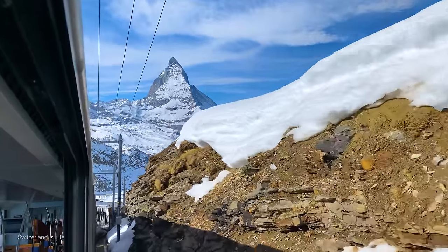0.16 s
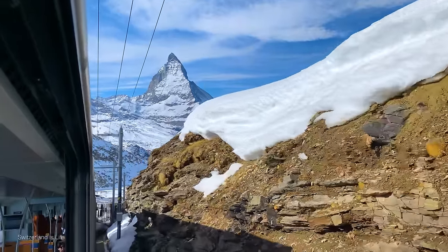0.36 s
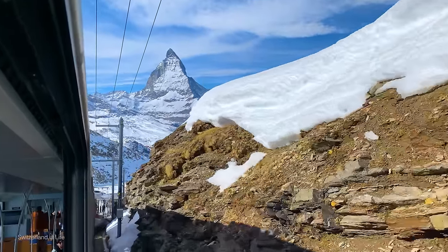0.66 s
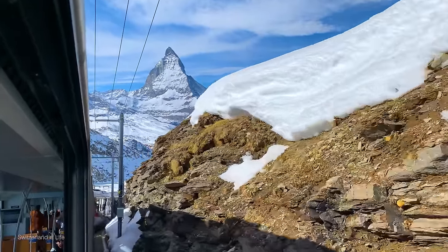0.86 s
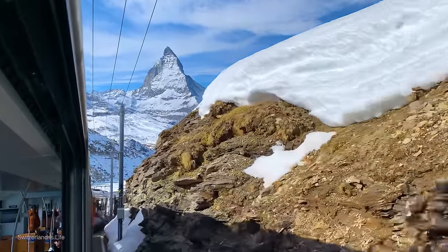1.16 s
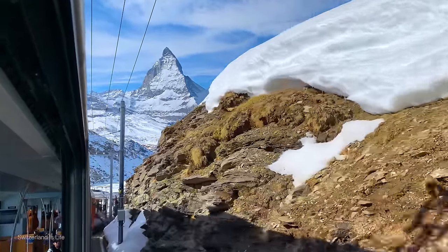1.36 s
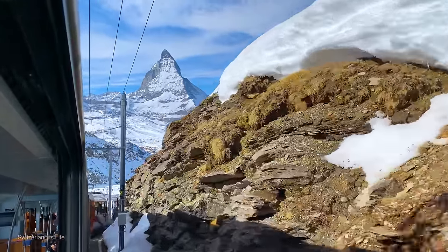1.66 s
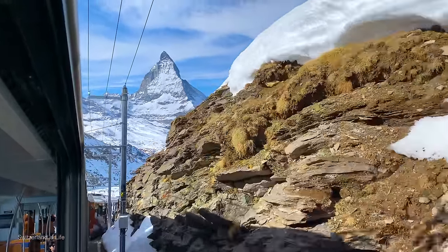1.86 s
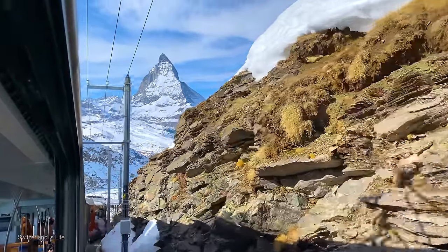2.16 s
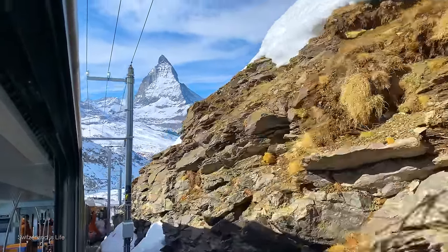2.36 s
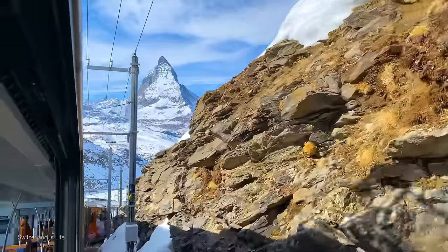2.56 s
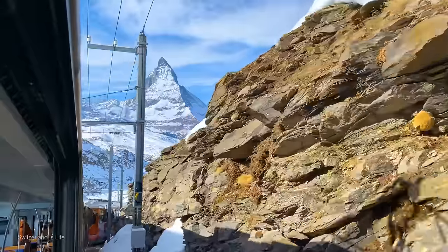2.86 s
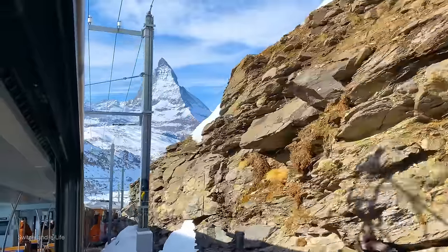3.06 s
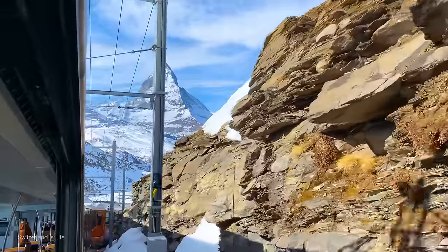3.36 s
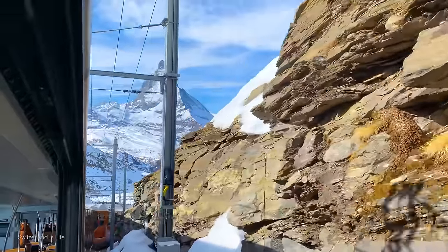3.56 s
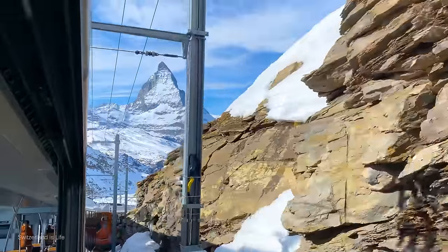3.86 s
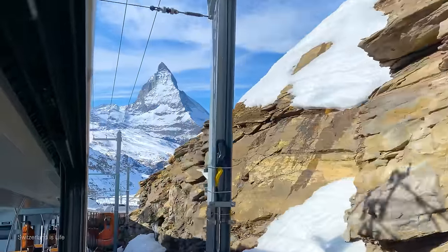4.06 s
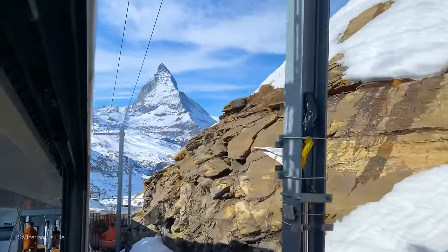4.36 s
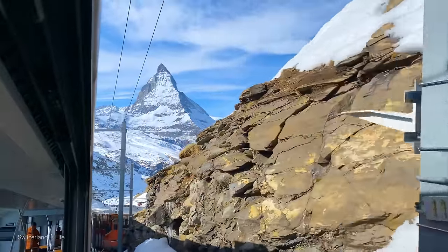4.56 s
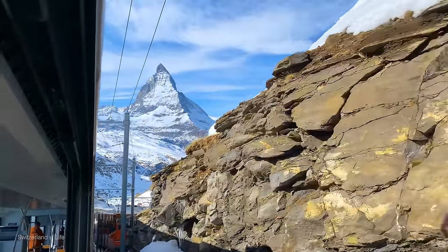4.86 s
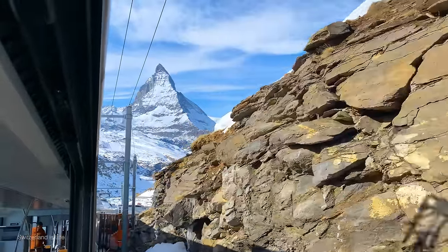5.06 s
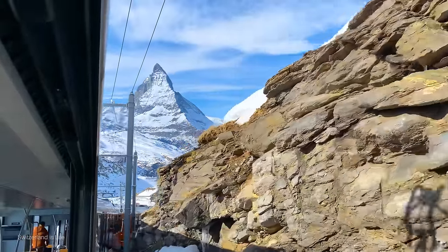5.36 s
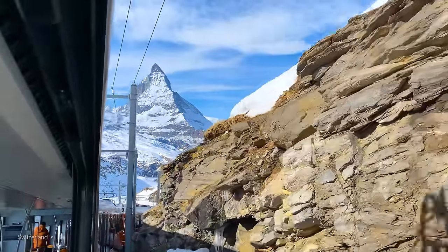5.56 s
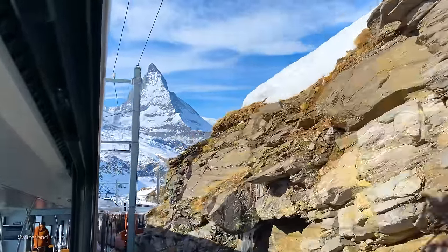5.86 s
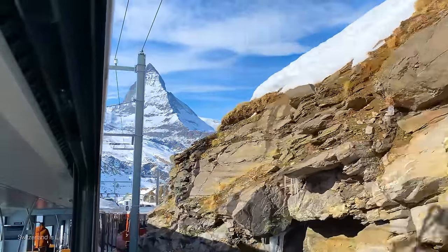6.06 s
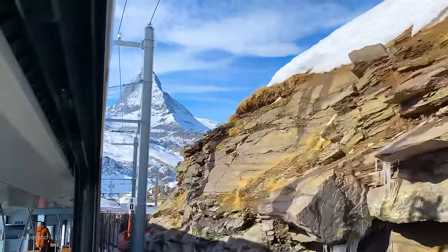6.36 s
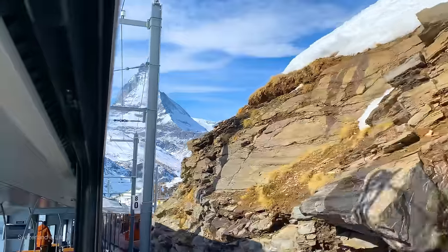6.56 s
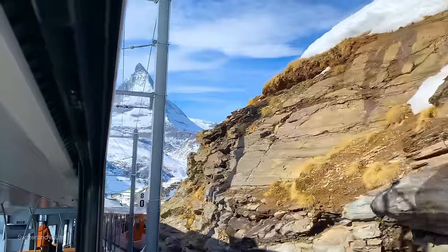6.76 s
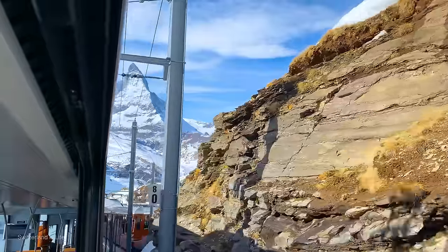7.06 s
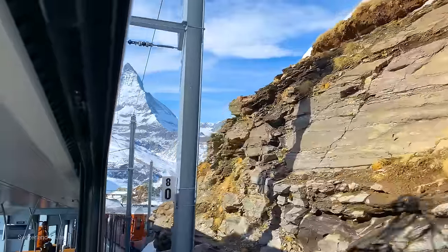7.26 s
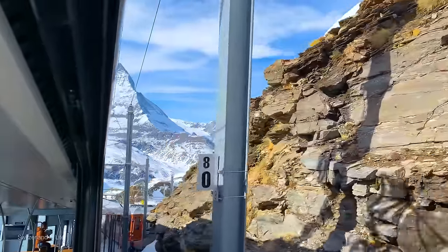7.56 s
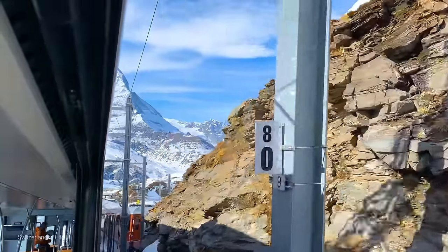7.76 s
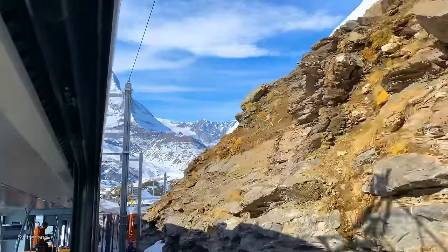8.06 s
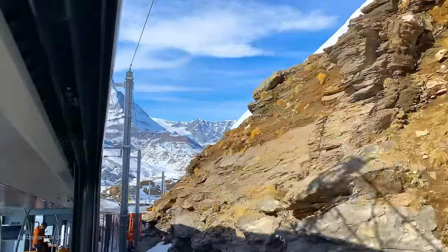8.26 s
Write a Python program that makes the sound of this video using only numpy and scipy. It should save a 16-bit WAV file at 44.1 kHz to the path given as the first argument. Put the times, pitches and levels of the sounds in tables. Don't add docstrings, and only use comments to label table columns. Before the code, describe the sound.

From 0 to 8.4 s an electric rack train rumbles steadily, heard inside the carriage at an open window beside a rock cutting. Most energy is low: cog teeth throb unevenly around 84 Hz, the frame rings near 170 Hz, and floor, walls and windows boom up to about 600 Hz. A faint wall hum fades around 2 s. Soft thuds, hollow panel rings and trim buzzes recur, notably near 2, 2.9, 5.2, 6 and 6.4 s. Rolling, grinding and gear whine sit quieter above, with whine rising near 1.1 and 4.5 s, plus a small clack at 4.76 s. At 2.44 s a valve gives a short airy puff with a weak trailing leak. Light flange scraping begins about 6.5 s; from 7.3 s thin, flickering high squeals continue to the end, still beneath the rumble. Close, lightly decorrelated stereo.

```python
import sys
import numpy as np
from scipy import signal
from scipy.fft import rfft, irfft, next_fast_len
from scipy.io import wavfile
from scipy.ndimage import uniform_filter1d

SR = 44100
rng = np.random.default_rng(int(sys.argv[2]) if len(sys.argv) > 2 else 0)


def log_audio(samples):
    frames = np.atleast_2d(samples).T
    limited = np.clip(frames, -1, 1)
    pcm = np.round(limited * 32767).astype(np.int16)
    wavfile.write(sys.argv[1], SR, pcm)


def to_linear_factor(level_db):
    exponent = np.asarray(level_db, float) / 20
    return 10 ** exponent


N = 370440
HZ, T = np.fft.rfftfreq(next_fast_len(N), 1 / SR), np.arange(N) / SR
LOG_HZ = np.log(HZ + 1)

# (frequency [Hz], level per Hz [dB])
FLOOR_COLOUR = [(18, -47), (28, -16), (40, -8.5), (60, 0.5), (100, -2.5), (140, 1.5), (180, -7.5),
                (220, -12.5), (300, -24)]
WALL_COLOUR = [(140, -48), (190, -0.5), (290, -3.5), (330, -27), (400, -50)]
WINDOW_COLOUR = [(250, -37), (310, -1), (440, -6), (490, -8.5), (600, -44)]
TRIM_COLOUR = [(380, -18.5), (460, -8.5), (560, -8), (720, -14), (820, -21), (1100, -43)]
# (frequency [Hz], width [Hz], level [dB])
PANEL_MODES = [(138, 14, -2), (204, 11, -10), (254.4, 7.4, 2), (355, 31, 0), (401, 7.8, 2.5),
               (440, 13, -1.5), (581, 30, -13.5), (650, 19, -8)]
# (time [s], rise [dB], half length [s])
THUDS = [(0.02, -1.5, 0.045), (.18, 4, 0.027), (1.08, 2.5, 0.047), (1.71, -0.5, 0.025), (1.99, 6.5, .04),
         (2.9, 1.5, .25), (4.5, 2.5, .15), (5.36, 2, 0.099), (6.22, -2, 0.05), (6.43, 8, 0.022),
         (7.0, 5, .12), (7.55, 2, .08), (8.21, 4, .06)]
# (time [s], rise [dB], half length [s])
BUZZES = [
    (1.94, -2, 0.046),
    (3.63, 3.5, 0.099),
    (4.54, 1, .08),
    (5.78, 0, .05),
    (6.1, 3, 0.088),
    (6.38, 4, 0.063),
    (6.74, 2, 0.11),
    (8.1, 1.5, 0.17),
]
# (time [s], echo [dB])
ROCK_ECHO = [(0, 1.5), (.5, -1.5), (.9, -3), (1.3, -3), (1.8, -1), (2.2, 1.5), (2.8, 1.5), (3.5, 2),
             (4.1, 2.5), (4.65, 4.5), (5.2, 1), (5.8, 2), (6.4, 0.5), (6.9, -1.5), (7.3, -1.5), (7.8, 2.5),
             (8.15, 3), (8.4, 5)]
# (time [s], load [dB])
BODY_LOAD = [(0, -2), (.6, 1), (1.3, 0), (2.1, -0.5), (2.5, -0.5), (3.0, 1.5), (3.4, 3), (3.8, 3),
             (4.2, 0.5), (4.5, -4), (5.0, -3), (5.55, -6), (5.85, -3), (6.3, -2), (6.9, -6), (7.3, -4),
             (7.8, -2.5), (8.4, -5)]
# (level [dB], share of the rock echo, share of the load)
FLOOR_MIX, WALL_MIX = (-25.5, -0.064, 0.05), (-24.5, 0.13, 0.44)
WINDOW_MIX, TRIM_MIX = (-24.3, 0.092, 0.79), (-30, 0.59, 0.16)
ROLL_MIX, GRIND_MIX, WHINE_MIX = (-38, 0.2, 0.16), (-48.5, 0.66, 0.055), (-39.5, -.2, .6)
RING_MIX, RATTLE_MIX, HISS_MIX = (-47.5, 0.54, .4), (-51.5, 1.34, 0.05), (-67.5, 0.54, .1)

TOOTH_HZ, TOOTH_SAG_HZ_PER_S, TOOTH_DB, DOUBLE_DB = 84.4, .45, -29, -28
# (time [s], rise [dB], half length [s])
BITES = [(.15, 9.5, 0.057), (.7, 8, 0.14), (1.1, 4, 0.075), (1.45, 6, 0.05), (1.8, 9.5, 0.1),
         (2.2, 3, 0.25), (2.85, 3.5, 0.18), (3.3, 2, 0.22), (4.45, 9, 0.079), (4.95, 10, 0.073),
         (5.7, 9.5, 0.21), (6.25, 9.5, 0.26), (7.05, 9.5, 0.19), (7.5, 5.5, 0.29), (7.85, 8, 0.17)]
# (time [s], rise [dB], half length [s])
FRAME_RINGING = [(.05, 7, .06), (.75, 6.5, 0.24), (1.1, 4, 0.13), (1.8, 2, 0.35), (2.6, 8.5, .1),
                 (3.0, 7, 0.052), (3.4, 6, 0.21), (3.65, 5.5, 0.082), (4.0, 10.5, 0.14), (4.35, 6.5, 0.056),
                 (4.8, 8, 0.32), (5.4, 9, 0.2), (6.6, 7, 0.092), (7.05, 8.5, 0.28), (7.7, 2.5, 0.18)]

# (frequency [Hz], level per Hz [dB])
ROLL_COLOUR = [(550, -44), (750, -1), (900, -4), (1200, -6), (1450, -7.5), (2200, -16), (2500, -25),
               (3200, -33)]
GRIND_COLOUR = [(2400, -19), (3200, -4.5), (4400, -8), (5200, -11), (7600, -18.5), (9000, -17)]
RATTLE_COLOUR = [(1800, -9), (2250, 0), (2700, -1.5), (3150, -4), (3700, -39)]
# (frequency [Hz], width [Hz], level [dB])
RAIL_MODES = [(866, 55, 0), (1600, 75, -0.5), (1682, 41, 0), (1772, 87, -5.5), (1950, 340, -12)]
WHEEL_MODES = [(3520, 100, -2.5), (3797, 63, 1), (3980, 290, -1), (4205, 90, -3)]
# (time [s], rise [dB], half length [s])
PULLS = [
    (0.02, 8.5, 0.17),
    (.75, 3, 0.12),
    (1.12, 6.5, 0.084),
    (3.75, 0.5, 0.12),
    (4.55, 9, .12),
    (7.38, 4, .2),
    (8.38, 7, .08),
]

# (frequency [Hz], level per Hz [dB])
HISS_COLOUR = [(4000, -24), (6000, -3.5), (7800, -7.5), (8250, -7), (9000, -5), (10000, 0), (11500, -5),
               (13000, -11), (15600, -14), (16000, -14)]
JET_COLOUR = [(1500, -10), (3000, -8), (7800, -4.5), (8300, -7), (9300, -4.5), (10800, -1.5), (12500, -3.5),
              (14000, -9), (16000, -7)]
# (time [s], rise [dB], half length [s])
HISS_LULL = [
    (6.92, -2, .15),
]
VALVE_S, VALVE_DB, OPEN_S, HOLD_S, BLOW_DB_PER_S = 2.437, -42, 0.008, 0.052, 62
SURGE_DB, SURGE_S = 1.5, .03
LEAK_DB, LEAK_DB_PER_S = -57, 8.5

# (time [s], level [dB], pitch [Hz], length [s])
RING_NOTES = [(.2, -27, 138, .06), (0.966, -25, 355, 0.035), (1.1, -27, 138, 0.047), (1.7, -22, 145, 0.075),
              (2.141, -22, 356, 0.049), (2.5, -22.5, 136, .07), (2.87, -19.5, 134, 0.073),
              (3.485, -23, 347, 0.063), (3.96, -26, 361, 0.054), (3.3, -27, 445, 0.12),
              (4.19, -25, 415, 0.05), (4.299, -23, 262, 0.045), (4.5, -34.5, 1650, .05),
              (4.765, -44, 2570, .025), (4.81, -42, 2610, 0.015), (4.755, -36, 1740, .02),
              (5.15, -20.5, 247.7, 0.085), (5.75, -24, 385, 0.03), (5.965, -17, 251.8, 0.042),
              (6.021, -24, 355, 0.097), (6.448, -27.5, 369, 0.085), (5.84, -22, 390, .035),
              (6.83, -24, 206, 0.054), (.68, -37, 796, .05), (1.18, -37, 872, .05), (2.62, -38, 785, .04),
              (3.16, -23, 362, .07), (3.24, -27, 441, .05), (3.53, -24, 344, .04), (3.78, -31, 516, .04),
              (3.9, -24, 352, .06), (4.16, -23, 345, .04), (4.28, -32, 559, .04), (4.69, -37, 742, .04),
              (6.79, -40, 1281, .03), (7.35, -29, 430, .05), (7.56, -35, 650, .05), (7.74, -29, 465, .05),
              (7.86, -28, 400, .05), (8.19, -38, 1141, .03), (8.23, -37, 1216, .03), (8.1, -45, 5720, .03),
              (8.19, -46, 2690, .025), (5.49, -20, 161, .05), (3.6, -21, 190, .04), (8.27, -29, 450, .05),
              (8.38, -27, 473, .05), (.1, -27, 370, .05), (1.68, -25, 375, .08),
              (7.63, -52, 5700, .05), (7.78, -55, 5690, .07), (7.95, -52, 5705, .06), (8.21, -51, 5730, .04),
            (7.51, -50, 6760, .03), (7.68, -49, 6720, .03), (8.1, -51, 6790, .04), (7.71, -52, 7800, .04),
            (8.28, -47, 4650, .03), (8.05, -45, 2720, .02), (8.01, -40, 968, .03), (.55, -25, 410, .07),
            (2.68, -25, 375, .08), (5.9, -25, 225, .05), (4.32, -21, 160, .04), (6.13, -26, 345, .05)]
HUM_HZ, HUM_DB, HUM_ENDS_S, HUM_FADE_S = 255.4, -34.5, 2.2, 0.37
SECOND_PATH = .3

# (time [s], level [dB], centre [Hz], spread [octaves], length [s])
SCUFFS = [(0.147, -53, 6000, 0.55, .05), (.29, -59.5, 6000, .6, .05), (1.172, -51, 4500, .6, .03),
          (1.69, -47, 4300, 0.45, 0.089), (2.066, -42.5, 3900, .5, 0.085), (3.72, -50, 6500, .6, 0.048),
          (4.51, -44, 3780, .7, .03), (4.762, -39, 4300, .4, 0.012), (4.76, -48, 12000, .25, .008),
          (5.799, -24, 393, 0.11, 0.12), (4.88, -36, 1600, 0.17, 0.023), (5.625, -51, 6000, .6, .03),
          (6.58, -45, 3000, .5, 0.033), (6.71, -45, 3000, .7, .02), (8.2, -36, 1170, 0.3, 0.055),
          (3.59, -22, 330, .9, .03), (5.49, -20, 110, .8, .03), (2.09, -38, 1000, .25, .05),
          (1.62, -56, 11500, .3, .07), (3.42, -57, 12000, .35, .06), (4.765, -52, 7200, .15, .012),
          (1.66, -48, 4400, .25, .012), (1.72, -48, 4800, .25, .012), (3.714, -31, 900, .7, .006),
          (7.541, -33, 900, .7, .006)]

# (time [s], pressure [dB])
FLANGE_PRESSURE = [
    (6.45, -72),
    (6.7, -59),
    (6.9, -81),
    (7.2, -63),
    (7.4, -54),
    (7.64, -54),
    (7.9, -58.5),
    (8.08, -54),
    (8.4, -57),
]
# (frequency [Hz], level per Hz [dB])
SCRAPE_COLOUR = [(3000, -26), (4800, -6), (6200, -5), (7500, -6), (8300, -7), (11000, -2), (14000, -6),
                 (16000, -8)]
# (frequency [Hz], width [Hz], level [dB])
SCRAPE_MODES = [(13400, 300, 2), (14700, 300, 2)]
# (frequency [Hz], width [Hz], level [dB])
SONG_MODES = [
    [(6770, 160, -2), (7850, 110, -2.6)],
    [(5710, 56, 0)],
    [(4640, 120, 0)],
    [(3660, 99, 0), (2690, 70, -2)],
]
# (time [s], rise [dB], half length [s])
SONG_FLARES = [
    [(6.6, 3, .07), (7.1, 5, 0.046), (7.45, 6.5, 0.18), (7.68, 9, 0.14), (8.05, 9.5, 0.27), (8.32, 6, .1)],
    [(7.2, 8, .06), (7.45, 5, .15), (7.63, 9, .08), (7.97, 10, .12), (8.12, 3, .05), (8.2, 11, .1),
     (8.32, 6, .05)],
    [(6.74, 8, .06), (7.3, 6, .06), (7.55, 4, .2), (8.15, 9, .1), (8.33, 10, .12)],
    [(6.7, 5, 0.04), (7.12, 3, .05), (8.05, 8, 0.15), (8.28, 3, 0.096)],
]
SONG_DB, SONG_FOLLOWS = (-66.5, -71, -67, -61), 0.22
WAVER_S = 0.000298

# (frequency [Hz], width [Hz], level [dB])
OVERTONES = [(8930, 120, -63.5), (10100, 130, -63), (11200, 150, -63), (12280, 160, -61)]
# (time [s], rise [dB], half length [s])
FLICKERS = [
    [(7.4, 8, .05), (7.5, 11, .04), (7.68, 12, .1), (7.8, 5, .05), (7.91, 9, .05), (8.02, 12, .08),
     (8.25, 4, .12)],
    [(7.28, 5, .04), (7.45, 9, .1), (7.64, 11, .04), (7.75, 8, .08), (7.9, 8, .07), (8.05, 8, .08),
     (8.25, 11, .08), (8.38, 8, .05)],
    [(7.39, 7, .04), (7.5, 8, .05), (7.65, 11, .08), (7.78, 6, .06), (7.95, 5, .05), (8.1, 8, .08),
     (8.28, 8, .08)],
    [(7.42, 9, .05), (7.53, 12, .06), (7.65, 9, .03), (7.76, 7, .08), (7.97, 9, .05), (8.07, 6, .05),
     (8.2, 4, .06)],
]

# (frequency [Hz], likeness [0-1])
PORT_LIKENESS = [(40, 0.58), (150, 0.85), (400, 0.8), (600, 0.93), (900, 1.1), (1400, 1), (1750, -0.05),
                 (2150, 0.65), (2600, 0.2), (4000, 0.47), (5000, 0.23), (8000, 0.17), (8250, 1)]
# (frequency [Hz], left minus right [dB])
PORT_LEAN = [(30, -1), (60, 1), (140, 2.5), (330, 1.5), (770, -1.5), (1300, -0.5), (2100, 6), (3000, 2.5),
             (4500, 1), (5500, 2.5), (6800, 1.5), (8000, -7), (8250, 0)]
# (frequency [Hz], phase [rad])
PORT_LEAD = [(220, 0.65), (400, 0.3), (520, 1.18), (850, 1.31), (1100, 1.67), (1500, 2.45), (2000, 3.7),
             (2300, 4.04), (3000, 3.96), (3800, 5.75), (5000, 7), (6100, 10.4), (8000, 15.2)]
SPLIT_HZ, EDGE_HZ = 8150, 15770
NULL_HZ, COMB_HZ = 8700, 4860


def evened(x):
    return x / np.sqrt(np.mean(x ** 2) + 1e-20)


def along_hz(points):
    hz, value = np.transpose(points)
    return np.interp(LOG_HZ, np.log(hz), value)


def power_of(colour=None, modes=()):
    power = 0
    if colour is not None:
        inside = (HZ > colour[0][0]) * (HZ < colour[-1][0])
        power = to_linear_factor(along_hz(colour)) ** 2 * inside
    for hz, width, db in modes:
        power = power + to_linear_factor(db) ** 2 / (1 + (2 * (HZ - hz) / width) ** 2) ** 2
    return power


def noise(power):
    z = rng.standard_normal((2, len(HZ), 2)).view(complex)[..., 0]
    return evened(irfft(z * np.sqrt(power), next_fast_len(N))[:, :N])


def wander(hz):
    f = np.fft.rfftfreq(2048, T[-1] / 2047)
    z = rng.standard_normal((2, 2, len(f)))
    slow = evened(irfft((z[0] + 1j * z[1]) * (f < hz)))
    return np.array([np.interp(T, np.linspace(0, T[-1], 2048), row) for row in slow])


def swells(rows):
    t = T[::128]
    return np.interp(T, t, sum(db * np.exp(-((t - s) / half) ** 2) for s, db, half in rows))


def level(db, rock, load):
    t = T[::128]
    echo = rock * np.interp(t, *np.transpose(ROCK_ECHO))
    strain = load * np.interp(t, *np.transpose(BODY_LOAD))
    return np.interp(T, t, db + echo + strain)


def patchy(x, patchy_db, frames, bins):
    z = signal.stft(x, nperseg=1024)[2]
    patches = rng.standard_normal(z.shape[:0:-1]).T
    patches = evened(uniform_filter1d(uniform_filter1d(patches, bins, 0), frames, 1))
    return signal.istft(z * to_linear_factor(patchy_db * patches), nperseg=1024)[1][:, :N]


def teeth():
    tooth_hz = TOOTH_HZ - TOOTH_SAG_HZ_PER_S * T + 3.2 * wander(10.5)
    double_hz = 169. + 5.3 * wander(5.)
    turns = np.cumsum(tooth_hz, 1) / SR + rng.random((2, 1))
    double_turns = np.cumsum(double_hz, 1) / SR + rng.random((2, 1))
    tooth_grip = 1 + .35 * wander(16.)
    frame_grip = 1 + .4 * wander(20.)
    drumming = to_linear_factor(TOOTH_DB + swells(BITES) + 2.5) * tooth_grip * np.sin(2 * np.pi * turns)
    ringing = to_linear_factor(DOUBLE_DB + swells(FRAME_RINGING) + 1.5) * frame_grip * np.sin(2 * np.pi * double_turns)
    return drumming + ringing


def body():
    groups = [(FLOOR_COLOUR, PANEL_MODES[:1], FLOOR_MIX, swells(THUDS) + 3.14),
              (WALL_COLOUR, PANEL_MODES[1:3], WALL_MIX, 1.),
              (WINDOW_COLOUR, PANEL_MODES[3:6], WINDOW_MIX, 1.),
              (TRIM_COLOUR, PANEL_MODES[6:], TRIM_MIX, swells(BUZZES) + .8)]
    out = np.zeros((2, N))
    for colour, modes, mix, rise_db in groups:
        boom_db = 0.89 * wander(6.)[0]
        out += to_linear_factor(level(*mix) + rise_db + boom_db) * noise(power_of(colour, modes))
    return out


def running_gear():
    judder = wander(14.)[0]
    roll = to_linear_factor(level(*ROLL_MIX) + 4.5 + 0.9 * judder) * noise(power_of(ROLL_COLOUR, RAIL_MODES[4:]))
    whine = to_linear_factor(level(*WHINE_MIX) + swells(PULLS)) * noise(power_of(modes=RAIL_MODES[:1]))
    ring = to_linear_factor(level(*RING_MIX) + 3.5 + 0.72 * wander(14.)[0]) * noise(power_of(modes=RAIL_MODES[1:4]))
    grind = to_linear_factor(level(*GRIND_MIX) + 2.0 + 0.7 * judder) * noise(power_of(GRIND_COLOUR, WHEEL_MODES))
    rattle = to_linear_factor(level(*RATTLE_MIX) + 3.0 + 0.56 * judder) * noise(power_of(RATTLE_COLOUR))
    return patchy(roll + whine + ring + grind + rattle, 1.0, frames=6, bins=6)


def air():
    hiss_db = level(*HISS_MIX) + swells(HISS_LULL) + 12.0 + 0.46 * wander(13.)[0]
    converter = [(8070, 210, 5.8)]  # Hz, width Hz, dB
    hiss = to_linear_factor(hiss_db) * noise(power_of(HISS_COLOUR, converter))
    since = np.maximum(T - VALVE_S - OPEN_S - HOLD_S, 0)
    surge = SURGE_DB * np.clip((T - VALVE_S - OPEN_S) / SURGE_S - 1, -1, 0)
    burst = to_linear_factor(VALVE_DB + surge - BLOW_DB_PER_S * since)
    leak = to_linear_factor(LEAK_DB - LEAK_DB_PER_S * since)
    opening = np.clip((T - VALVE_S) / OPEN_S, 0, 1)
    return hiss + opening * (burst + leak) * to_linear_factor(6.0) * noise(power_of(JET_COLOUR))


def rings():
    hum_fade = 1 / (1 + np.exp((T - HUM_ENDS_S) / HUM_FADE_S))
    hum = to_linear_factor(HUM_DB) * hum_fade * noise(power_of(modes=[(HUM_HZ, 6., 0)]))
    out, t = np.zeros((2, N)), np.arange(-4096, 12288) / SR
    for s, db, hz, length in RING_NOTES:
        u, start = t / length, round(s * SR) - 4096
        swell = np.exp(-np.where(u < 0, 1.4 * u ** 2, u ** 2))
        note = np.sin(2 * np.pi * (hz * t + rng.random((2, 1)))) * swell
        part = out[:, start:start + len(t)]
        part += to_linear_factor(db + 4.5) * (note * [[1], [SECOND_PATH]])[:, :part.shape[1]]
    return out + hum


def scuffs():
    out, hz = np.zeros((2, N)), np.fft.rfftfreq(16384, 1 / SR)
    for s, db, centre, spread, length in SCUFFS:
        colour = np.exp(-.5 * (np.log2((hz + 1) / centre) / spread) ** 2)
        burst = evened(irfft(rfft(rng.standard_normal((2, 16384))) * colour))
        u = (np.arange(16384) - 4096) / SR / length
        swell = np.exp(-np.where(u < 0, 3 * u ** 2, u ** 2))
        start = round(s * SR) - 4096
        part = out[:, start:start + 16384]
        part += (to_linear_factor(db) * burst * swell)[:, :part.shape[1]]
    return out


def flange():
    contact = np.clip((T - FLANGE_PRESSURE[0][0]) / .1, 0, 1)
    touch = contact * to_linear_factor(0.54 * wander(23.)[0])
    pressure = np.interp(T, *np.transpose(FLANGE_PRESSURE))
    scrape = to_linear_factor(pressure + 8.0) * noise(power_of(SCRAPE_COLOUR, SCRAPE_MODES))
    song = np.zeros((2, N))
    for db, rows, modes in zip(SONG_DB, SONG_FLARES, SONG_MODES):
        song += to_linear_factor(db + swells(rows) + 6.5) * noise(power_of(modes=modes))
    wobble = T + WAVER_S * wander(4.)[0]
    song = np.array([np.interp(wobble, T, path) for path in song])
    return touch * (scrape + to_linear_factor(SONG_FOLLOWS * (pressure - pressure.max())) * song)


def overtones():
    out = np.zeros((2, N))
    for (hz, width, db), rows in zip(OVERTONES, FLICKERS):
        lit = np.sqrt(np.maximum(to_linear_factor(swells(rows)) ** 2 - 1, 0))
        out += to_linear_factor(db) * lit * noise(power_of(modes=[(hz, width, 0)]))
    return out


def scene():
    dappled = patchy(air() + flange(), 0.85, frames=6, bins=16)
    return teeth() + body() + running_gear() + dappled + rings() + scuffs() + overtones()


def low_pass(x):
    return signal.sosfilt(signal.butter(12, 17100, fs=SR, output="sos"), x)


def record(dry):
    soft_ends = signal.windows.tukey(N, .001)
    a, b = rfft(dry * soft_ends, next_fast_len(N)) * (HZ < EDGE_HZ)
    same = np.clip(along_hz(PORT_LIKENESS), 0, 1)
    lean = to_linear_factor(along_hz(PORT_LEAN) / 2)
    late = np.exp(1j * along_hz(PORT_LEAD))
    spread = -np.exp(-2j * np.pi * (HZ - NULL_HZ) / COMB_HZ)
    turn = np.where(HZ < SPLIT_HZ, late, spread)
    right = turn * (same * a + np.sqrt(1 - same ** 2) * b)
    ports = irfft(np.array([a * lean, right / lean]), next_fast_len(N))[:, :N]
    return low_pass(ports)


dry = scene()
out = record(dry)
log_audio(out)
```